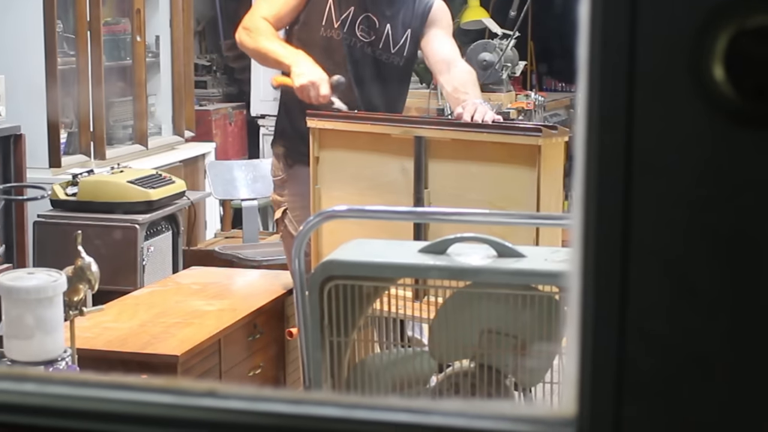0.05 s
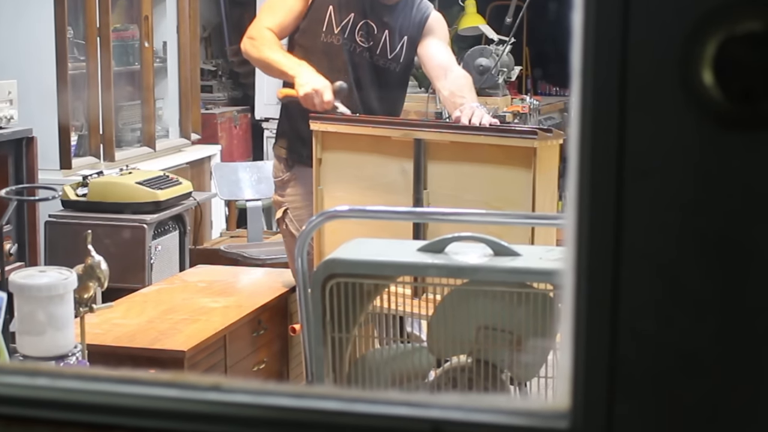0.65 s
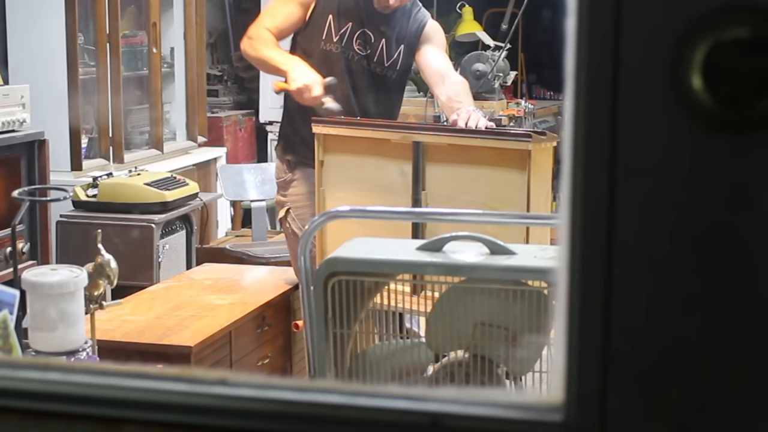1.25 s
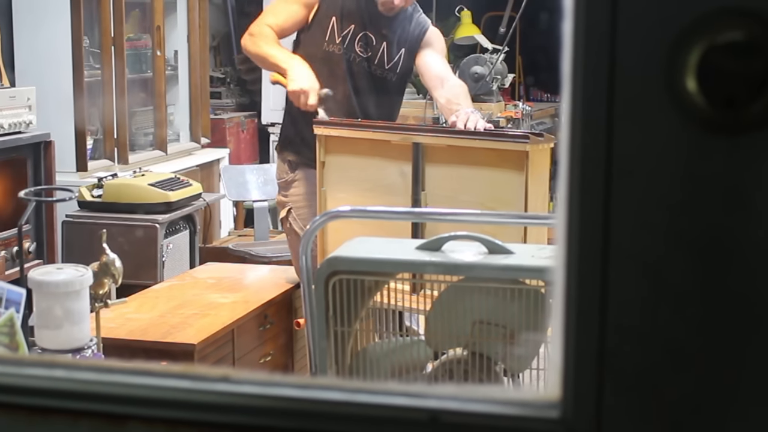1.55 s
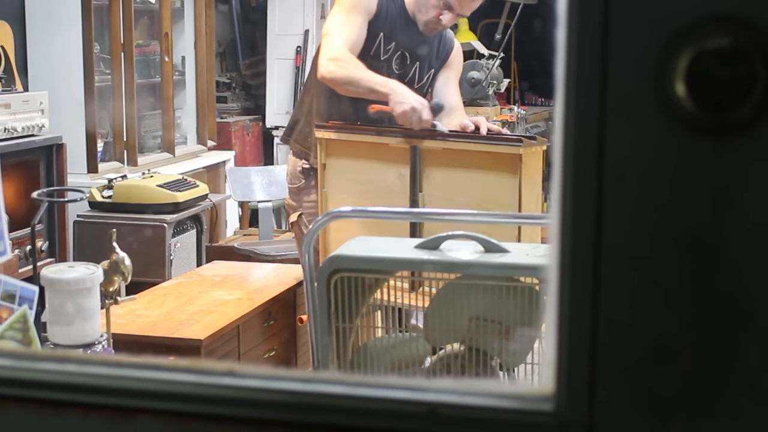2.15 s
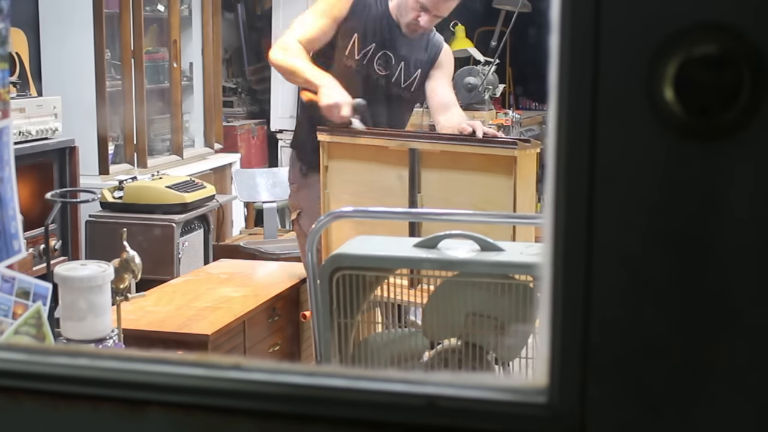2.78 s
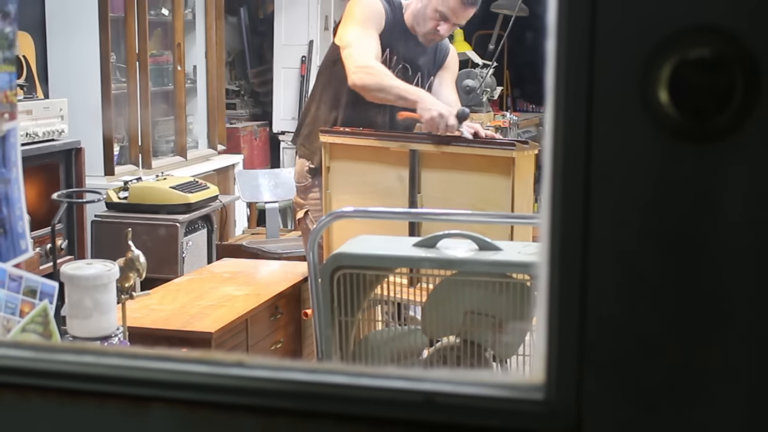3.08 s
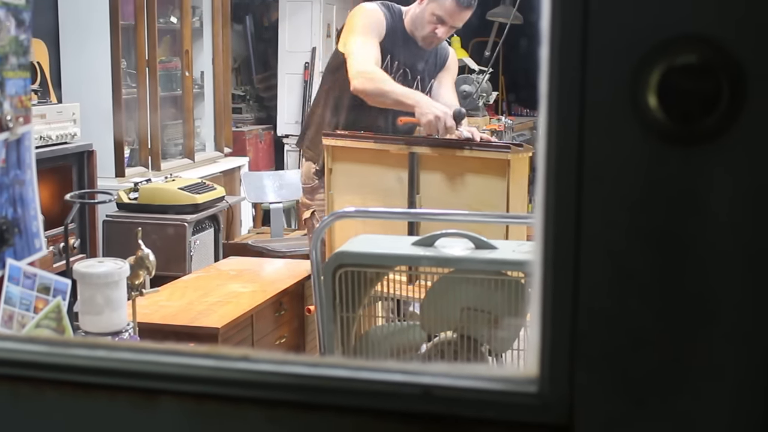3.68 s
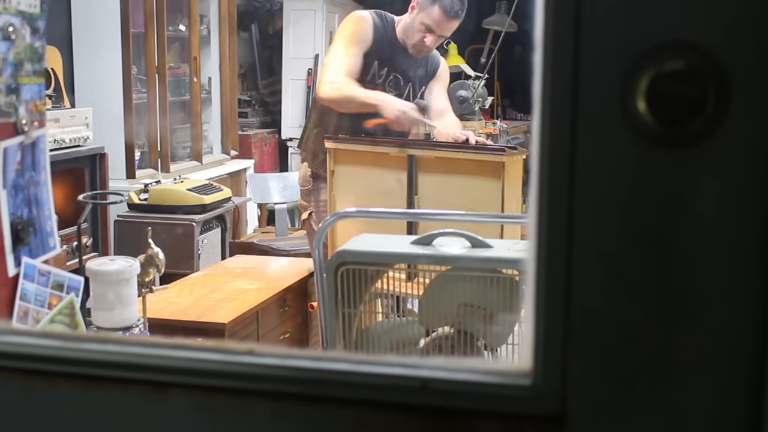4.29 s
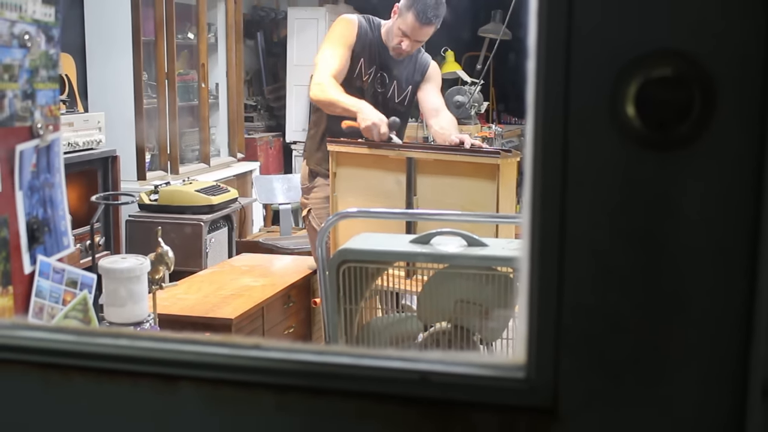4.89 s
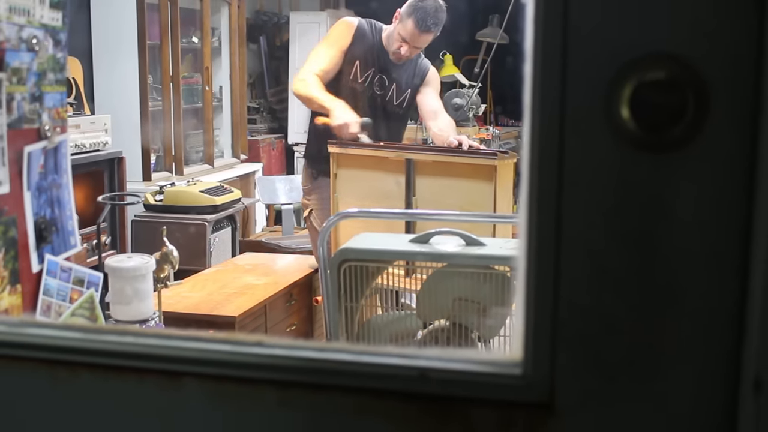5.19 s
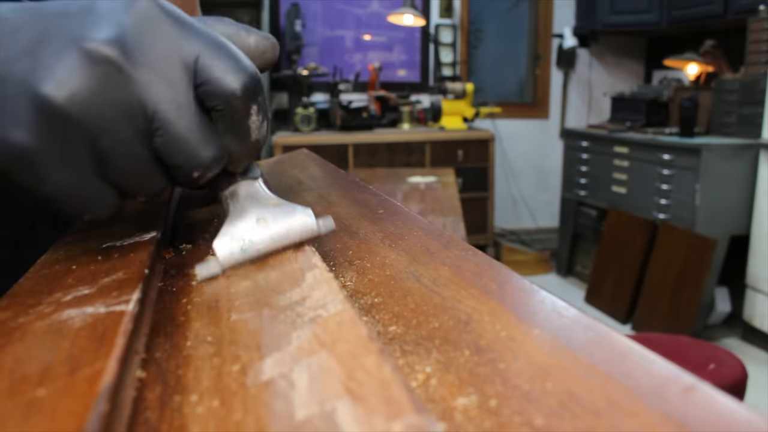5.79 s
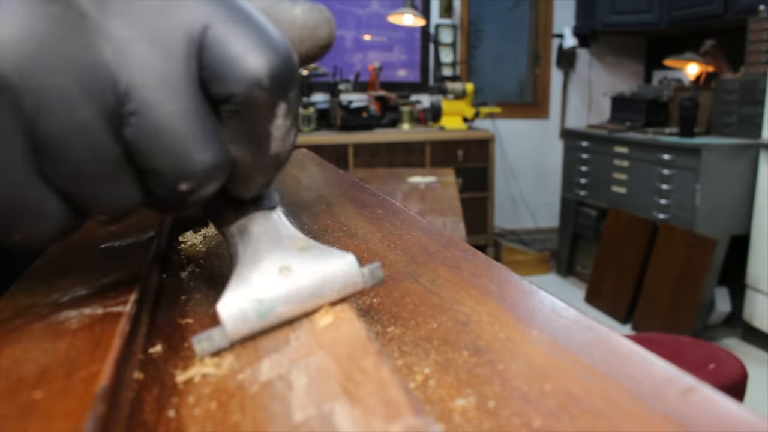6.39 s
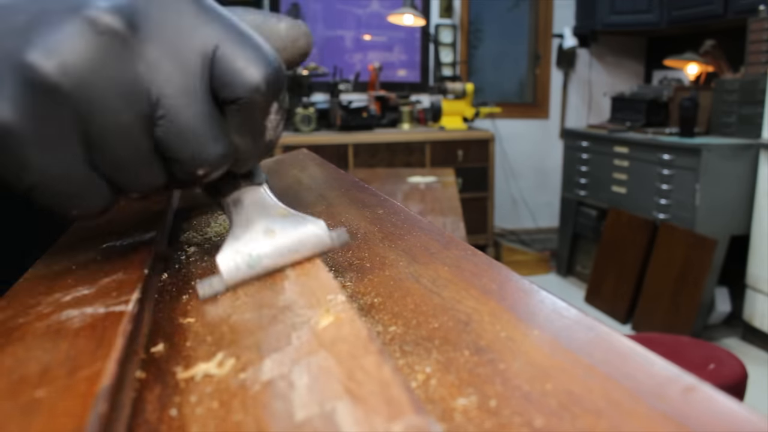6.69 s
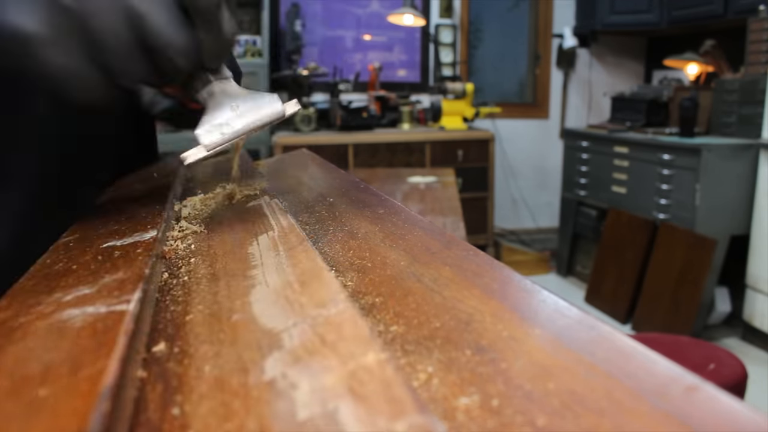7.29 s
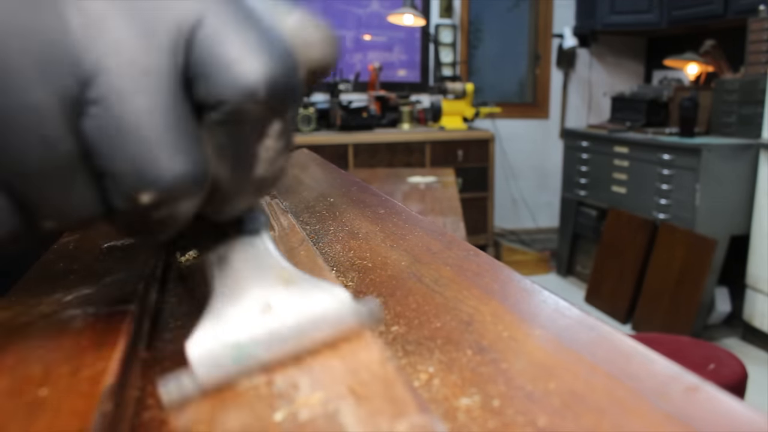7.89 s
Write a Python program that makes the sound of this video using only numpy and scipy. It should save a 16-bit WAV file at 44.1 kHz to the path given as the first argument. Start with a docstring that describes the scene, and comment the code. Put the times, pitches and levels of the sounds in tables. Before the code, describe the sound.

Faint crickets, katydids and distant traffic outdoors, then a close steel scraper rasps over wood in quick, clacking strokes.

```python
"""Furniture workshop, two scenes. Outside its closed window (stereo): far traffic, wind on the
microphone, katydids and crickets rubbing their wings. Then close up inside (mono): a steel scraper
is set down on a wooden top and dragged through old finish in quick strokes. The finish tears off
in tiny chips; blade and board ring in a small room, over soft hiss and a faint, distant engine."""
import sys
import numpy as np
from scipy import signal
from scipy.fft import rfft, irfft
from scipy.io import wavfile

SR = 44100
rng = np.random.default_rng(int(sys.argv[2]) if len(sys.argv) > 2 else 0)


def pcm_store(signal):
    """Save signal as 16-bit PCM."""
    levels = np.round(np.clip(np.atleast_2d(signal), -1, 1) * 32767)
    wavfile.write(sys.argv[1], SR, levels.astype(np.int16).T)


N = 355005
T = np.arange(N) / SR
OUTSIDE_END_S, INSIDE_START_S = 5.425, 5.455

# scraper and board resonances: f/Hz, width/Hz, gain/dB
TOOL_MODES = [(690, 60, -2), (790, 70, -1), (1320, 70, -2), (1420, 52, 7.5), (1760, 50, 3), (1822, 50, 6),
              (1920, 80, 1), (2150, 110, -3), (2405, 45, 5), (2480, 50, 1), (2746, 25, 3), (3003, 45, 6),
              (3130, 70, 2), (3247, 40, 6), (3420, 70, -3), (3880, 60, 0), (4010, 60, 0), (4244, 40, 4),
              (4400, 60, -3), (4685, 45, 2.5), (6322, 35, 4), (6581, 30, 1), (7000, 160, -2), (7614, 35, 1)]


def undb(db):
    """Decibels to gain."""
    return np.exp(np.asarray(db) * (np.log(10) / 20))


def rms(x):
    """Root mean square."""
    return np.sqrt(np.mean(x ** 2))


def unit(x):
    """Scale to rms 1."""
    return x / rms(x)


def noise():
    """White noise."""
    return rng.standard_normal(N)


def walk(rate_hz):
    """Random points joined by lines, rms 1."""
    return unit(np.interp(T * rate_hz, np.arange(N // 20), rng.standard_normal(N // 20)))


def curves(table):
    """Columns interpolated over the first, t/s."""
    times_s, *columns = np.transpose(table)
    return [np.interp(T, times_s, column) for column in columns]


def gate(start_s, end_s, rise_s, fall_s):
    """Linear rise, hold, exponential fall."""
    return np.clip((T - start_s) / rise_s, 0, 1) * np.exp(-np.clip((T - end_s) / fall_s, 0, 50))


def bump(peak_s, half_s):
    """Gaussian swell."""
    return np.exp(-np.minimum(((T - peak_s) / half_s) ** 2, 50))


def shape(x, gain):
    """Filter by gain(f/Hz)."""
    size = 45 * 2 ** 13
    return irfft(rfft(x, size) * gain(np.fft.rfftfreq(size, 1 / SR) + 1e-3), size)[:N]


def colour(x, points):
    """Filter by (f/Hz, gain/dB) points, to rms 1."""
    hz, db = np.transpose(points)
    return unit(shape(x, lambda f: undb(np.interp(np.log(f), np.log(hz), db))))


def band(hz, width_hz):
    """Bell-shaped noise band, rms 1."""
    return unit(shape(noise(), lambda f: np.exp(-2 * np.minimum(((f - hz) / width_hz) ** 2, 20))))


def lowpass(x, hz, order=2):
    """Causal Butterworth low-pass."""
    return signal.sosfilt(signal.butter(order, hz, fs=SR, output="sos"), x + 1e-18)


def highpass(x, hz, order=2):
    """Causal Butterworth high-pass."""
    return signal.sosfilt(signal.butter(order, hz, "high", fs=SR, output="sos"), x + 1e-18)


def stereo(x, left_lag_ms):
    """Left and right channels, the left delayed."""
    taps = np.arange(-16, 17)
    delay = np.sinc(taps - left_lag_ms * SR / 1000) * np.hanning(len(taps))
    return np.array([np.convolve(x, delay, "same"), x])


def ring(x, modes, wander_db=0):
    """Damped modes of alternating sign; gains may wander as the contact moves."""
    out = np.zeros(len(x))
    for k, (hz, width_hz, db) in enumerate(modes):
        mode = signal.lfilter(*signal.iirpeak(hz, hz / width_hz, fs=SR), x + 1e-18)
        out += (-1) ** k * undb(db + wander_db * walk(22) if wander_db else db) * mode
    return out


def echo(x, t60_s, wet_db, gap_s):
    """Add a diffuse tail of reflections."""
    t = T[:SR // 2]
    tail = rng.standard_normal(len(t)) * np.exp(-np.log(1000) * t / t60_s) * (t > gap_s)
    return x + undb(wet_db) * signal.oaconvolve(x, tail / np.linalg.norm(tail))[:N]


def insect_chorus():
    """Far insects merge into steady bands, independent left and right."""
    # f/Hz, width/Hz, level/dB
    bands = [(3190, 405, -78.5), (5384, 790, -71), (5985, 330, -77)]
    return sum(undb(db + 1.9 * walk(6.9)) * np.array([band(hz, width_hz), band(hz, width_hz)])
               for hz, width_hz, db in bands)


def traffic():
    """Far traffic: a slightly swelling wash with faint machinery hum."""
    # traffic and air spectrum: f/Hz, level/dB
    spectrum = [(20, 4.5), (50, -6.5), (68, 4), (95, -7.5), (130, -5), (230, -7), (420, -12), (650, -15.5),
                (950, -16), (1700, -28.5), (2500, -41.5), (4200, -44.5), (7500, -36), (10000, -38),
                (16000, -27.5)]
    # machinery hum: f/Hz, width/Hz, level/dB
    hum_bands = [(360, 12, -79.5), (537, 26, -78.5)]
    hum = sum(undb(db) * band(hz, width_hz) for hz, width_hz, db in hum_bands)
    wash = colour(noise(), spectrum) * undb(-59 + .5 * walk(2.68))
    spread = undb(-69.5) * colour(noise(), spectrum) * np.array([[1], [-1]])
    return stereo(hum + wash, left_lag_ms=.028) + spread


def breeze():
    """Wind rumbles differently on each microphone port."""
    # peak t/s, half length/s, level/dB
    gusts = [(0.792, 0.27, -54), (1.3, 0.37, -54), (4.35, 0.51, -60)]
    calm_db = -57
    wind = undb(calm_db) + sum(undb(db) * bump(s, half_s) for s, half_s, db in gusts)
    common = noise()
    return wind * np.array([unit(lowpass(.59 * common + noise(), 16.6)) for _ in range(2)])


def katydids():
    """Wing files rasp in the high treble, throbbing with each stroke."""
    # start/s, end/s, level/dB, rise/s, left lag/ms
    rasps = [(-.03, .432, -60.5, 0.0046, .002), (1.875, 1.895, -60, 0.0055, 0.027),
             (1.956, 1.972, -58, .006, .03), (2.033, 2.052, -58, .006, 0.028),
             (2.045, 3.38, -60.5, 0.16, 0.033)]
    # wing file spectrum: f/Hz, level/dB
    wing_file = [(5000, -41), (7500, -19.5), (10000, -10), (12300, -2), (13500, 3.5), (14800, 3.5),
                 (15700, -1.5)]
    stroke_hz = 44.9
    teeth = colour(noise() * undb(3 * walk(2000)), wing_file)
    ports = 0
    for start_s, end_s, db, rise_s, lag_ms in rasps:
        throb = np.cos(2 * np.pi * stroke_hz * (T - start_s - .003))
        song = teeth * gate(start_s, end_s, rise_s, .005) * undb(db + 6.5 * throb)
        ports = ports + stereo(song, lag_ms)
    return np.array([echo(port, t60_s=.1, wet_db=-3, gap_s=.00063) for port in ports])


def crickets():
    """Chirps of wing strokes, each falling in pitch; walls and leaves smear faint ones to a trill."""
    # chirps at set times, loud and faint alike: t/s, f/Hz, level/dB
    timed_chirps = [(.36, 5500, -70), (.55, 5100, -69), (.919, 5440, -59), (1.8, 5100, -67.5),
                    (2.2, 5070, -70), (2.34, 5430, -61), (2.73, 5460, -67.5), (2.86, 5070, -69),
                    (3.465, 5420, -60), (3.74, 5160, -68), (4.29, 5380, -65.5), (4.59, 5030, -70),
                    (4.969, 5420, -58.5)]
    # further crickets chirping at random times: f/Hz, level/dB, mean period/s
    far_crickets = [(5250, -68, 1.15), (5050, -76, 1.5)]
    chirp_s, stroke_hz, scatter_hz = .23, 54, 125
    scatter = unit(shape(noise(), lambda f: 1 / (1 + (f / scatter_hz) ** 2)))
    loudest_db = max(db for _, _, db in timed_chirps)
    chirps = list(timed_chirps)
    for hz, db, period_s in far_crickets:
        starts_s = period_s * (np.cumsum(1 + .15 * rng.standard_normal(9)) - rng.random() - 1)
        chirps += [(s, hz, db) for s in starts_s if 0 < s < OUTSIDE_END_S]
    direct, smeared = np.zeros(N), np.zeros(N)
    for start_s, hz, db in chirps:
        span = slice(int(start_s * SR), int((start_s + chirp_s) * SR))
        t = T[span] - start_s
        stroke = (t * stroke_hz) % 1
        phase = 2 * np.pi * np.cumsum(hz * (1 - .04 * (stroke - .5))) / SR
        swell = undb(db) * signal.windows.tukey(len(t), .18)
        nearness = np.interp(db - loudest_db, [-10, -3], [.35, .95])
        trill = scatter[span] * np.sin(2 * np.pi * hz * t)
        direct[span] += nearness * swell * 2 * np.sin(np.pi * stroke) * np.sin(phase)
        smeared[span] += np.sqrt(2 - 2 * nearness ** 2) * swell * trill
    overtone = undb(-87.5) * unit(highpass(direct ** 2, 9000, order=4))
    ports = stereo(undb(-2) * (smeared + direct) + overtone, left_lag_ms=.042)
    return np.array([echo(port, t60_s=.09, wet_db=-5, gap_s=.001) for port in ports])


def outdoors():
    """Traffic, wind and insects, weighted to the right."""
    pan = np.array([[-.5], [.5]])
    chorus = insect_chorus()
    rumble = traffic() + breeze()
    return rumble * undb(4 * pan) + (chorus + crickets()) * undb(2.2 * pan) + katydids()


def room_tone():
    """Soft indoor hiss that settles to a lower level."""
    # f/Hz, level/dB
    spectrum = [(30, -14), (100, -6), (170, 0.5), (280, 3.5), (480, 4), (750, 5.5), (1000, -1.5),
                (1500, 4.5), (2500, 5), (3600, 9.5), (5000, 6.5), (8000, -2), (12000, -11.5), (16000, -16)]
    # t/s, level/dB
    levels = [(5.9, -50.5), (6.35, -54), (7.4, -55.8)]
    hiss_db, = curves(levels)
    return colour(noise(), spectrum) * undb(hiss_db + .5 * walk(3.42))


def pressure():
    """Strokes glide, bite, hold and let up; returns the rasp, board and sizzle envelopes."""
    # touch/s, bite/s, lift/s, attack/s, rasp level/dB; relative to it: glide/dB, board/dB, sizzle/dB
    strokes = [(5.476, 5.478, 5.54, .005, -56, -10, -6, 0), (5.639, 5.694, 5.8, 0.0094, -54, 0.5, -3, 3.5),
               (5.991, 6.054, 6.243, 0.045, -38, -11.5, -3, 3.5),
               (6.418, 6.475, 6.53, .007, -37.5, -8, -7, 2), (6.68, 6.674, 6.87, .055, -36.5, -8, -7, 1),
               (7.027, 7.046, 7.25, 0.025, -39, -19, -5, 4.5),
               (7.454, 7.5002, 7.683, 0.0039, -38, -17.5, -6, 4),
               (7.886, 7.912, 8.01, 0.0071, -38, -21, -7, 5)]
    # edge skates over bare patches: t/s, half length/s, gain/dB
    skips = [(6.176, 0.013, -7), (7.084, 0.0071, -7), (7.538, 0.0076, -14), (7.24, 0.01, -6.5)]
    release_s, board_db_per_s = .015, -21  # the board booms less as the blade travels
    zones = np.zeros((3, N))
    for touch_s, bite_s, lift_s, attack_s, db, glide_db, board_db, sizzle_db in strokes:
        glide = undb(glide_db) * gate(touch_s, lift_s, .0018, release_s)
        hand = undb(db) * np.maximum(glide, gate(bite_s, lift_s, attack_s, release_s))
        travel_s = np.clip(T, bite_s, lift_s) - (bite_s + lift_s) / 2
        for zone, gain_db in zip(zones, (0, board_db + board_db_per_s * travel_s, sizzle_db)):
            zone += hand * undb(gain_db)
    return zones * undb(sum(db * bump(s, half_s) for s, half_s, db in skips))


def chips():
    """Finish fractures in tiny, uneven chips; returns the rasp, board and sizzle zones."""
    # tearing finish: f/Hz, level/dB
    spectrum = [(150, -28), (480, -15), (740, -4), (970, -9), (1400, 0), (1900, 1.5), (3000, -1),
                (5500, -1), (9000, -1), (12000, 0), (14300, 2.5), (15700, -1.5)]
    grit = undb(3.6 * walk(1500))
    finish = colour(noise() * grit, spectrum)
    for lag_s in (.00031, .00053, .00089):  # shallow combs drift as the edge meets new grain
        finish = finish + .16 * walk(25) * np.roll(finish, int(lag_s * SR))
    board = shape(finish, lambda f: f < 2500)
    sizzle = shape(finish, lambda f: f > 9000)
    return np.array([finish - board - sizzle, board, sizzle])


def tool(torn, rubbed, wander_db=0):
    """Tearing is heard directly; rubbing rings blade and board."""
    return undb(-3) * torn + ring(rubbed, TOOL_MODES, wander_db)


def scraping():
    """Pressure drives the chips; the grip judders, and zones flicker as parts of the edge catch."""
    grip = pressure() * undb(.7 * walk(160) + .5 * walk(35) + .7)
    torn, rubbed = chips(), chips()
    zone_rms = [rms(tool(tear[:SR], rub[:SR])) for tear, rub in zip(torn, rubbed)]
    drive = np.array([zone * undb(1.1 * walk(100)) / norm for zone, norm in zip(grip, zone_rms)])
    return tool(np.sum(drive * torn, axis=0), np.sum(drive * rubbed, axis=0), wander_db=3)


def knocks():
    """Hard landings clack and tick; soft ones mostly wake the board, which radiates little bass."""
    # blade lands or snags: t/s, level/dB, hardness/Hz, relative edge tick/dB
    blows = [(5.482, -18, 2440, -4), (5.644, -14, 2610, -3.5), (5.659, -17.5, 2500, 0),
             (5.7, -19, 2500, 10), (5.739, -12.5, 2400, -1.5), (5.812, -13.5, 2400, 0),
             (5.9923, 0, 4540, -1), (6.4033, -1, 4170, 2), (6.6634, -2, 2140, -15),
             (6.9247, -17.5, 2770, -2), (7.025, -0.5, 2820, -5.5), (7.4287, -2.5, 4670, -5.5),
             (7.886, -1.5, 2657, -4.5)]
    # damped modes of board and gripped blade: f/Hz, width/Hz, gain/dB
    clack_modes = [(774.5, 63, -5), (1330, 230, -14.5), (1838, 126, -1.5), (2400, 220, -2), (3133, 174, 3),
                   (4060, 220, 1.5)]
    force, ticks = np.zeros(N), np.zeros(N)
    t = T[:512]
    impulse = 1. * (t == 0)
    for s, db, hardness_hz, tick_db in blows + chatter():
        span = slice(int(s * SR), int(s * SR) + len(t))
        force[span] += undb(db) * lowpass(impulse, hardness_hz, order=4)
        ticks[span] += undb(db + tick_db) * rng.standard_normal(len(t)) * np.exp(-t / .0009)
    body = undb(11) * ring(force, clack_modes) + undb(1.5) * ring(force, TOOL_MODES)
    return highpass(body, 590, order=3) + undb(-16) * highpass(ticks, 3600, order=1)


def engine():
    """A far engine pulls through a gear change; only two harmonics pass the walls."""
    # t/s, firing rate/Hz, level/dB, relative second harmonic/dB
    run = [(5.5, 228, -81, 2), (5.7, 247, -81, 15), (5.82, 270, -65, -1.5), (5.95, 287, -65, -10),
           (6.55, 309.5, -67.5, -15), (6.86, 302, -71, -19), (6.98, 277.3, -67, 0), (7.2, 278, -83, -3),
           (7.4, 280.5, -67.5, -0.5), (7.65, 283.6, -78, 1), (7.88, 290, -68, 1), (8.05, 282.3, -80, 1)]
    hz, db, second_db = curves(run)
    phase = 2 * np.pi * np.cumsum(hz * (1 + .00884 * walk(40))) / SR
    return np.sqrt(2) * undb(db + 2 * walk(22)) * (np.sin(phase) + undb(second_db) * np.sin(2 * phase))


def chatter():
    """The blade bounces after some pulls; returns uneven blows, each weaker and softer."""
    # t/s, length/s, level/dB, hardness/Hz
    runs = [(7.224, .024, 5, 1700), (7.754, .008, -0.5, 1520)]
    gap_s, fade_db_per_s, soften_s, tick_db = .0053, -190, .059, -27
    blows = []
    for s, length_s, db, hardness_hz in runs:
        gaps_s = gap_s * np.exp(.243 * rng.standard_normal(12))
        blows += [(s + age_s, db + fade_db_per_s * age_s, hardness_hz * np.exp(-age_s / soften_s), tick_db)
                  for age_s in np.cumsum(gaps_s) - gaps_s[0] if age_s < length_s]
    return blows


def squeaks():
    """The edge briefly sticks and slips at a steady pitch."""
    # t/s, length/s, f/Hz, level/dB
    slips = [(7.574, 0.014, 7060, -35), (7.613, 0.009, 7300, -36)]
    return np.sqrt(2) * sum(undb(db) * gate(s, s + length_s, .002, .0016) * np.sin(2 * np.pi * hz * T)
                            for s, length_s, hz, db in slips)


def workshop():
    """Close scraper in a small, cluttered room."""
    scraper = scraping() + squeaks() + knocks()
    return echo(scraper, t60_s=.17, wet_db=-8.5, gap_s=.0019) + room_tone() + engine()


def scene():
    """Outside in stereo, a moment of silence, then inside in mono."""
    outside = outdoors() * gate(0, OUTSIDE_END_S, .00067, .0013)
    inside = workshop() * gate(INSIDE_START_S, N / SR, .00054, .002)
    return outside + inside


def record(dry):
    """Steep low-pass at 16 kHz."""
    return signal.sosfilt(signal.ellip(10, .2, 80, 16000, fs=SR, output="sos"), dry)


dry = scene()
out = record(dry)
pcm_store(out)
```